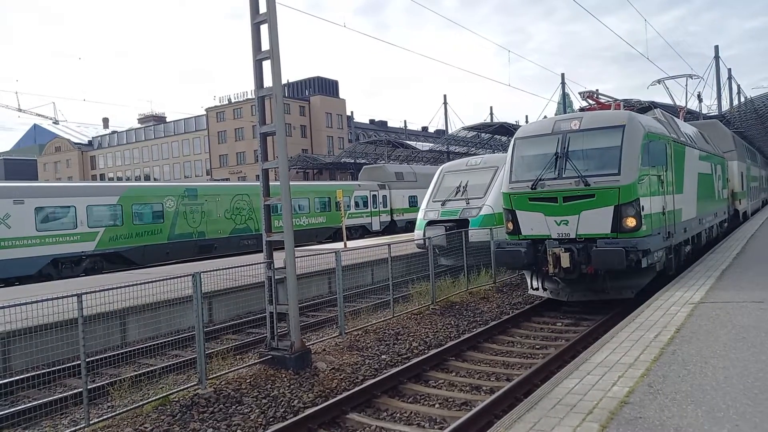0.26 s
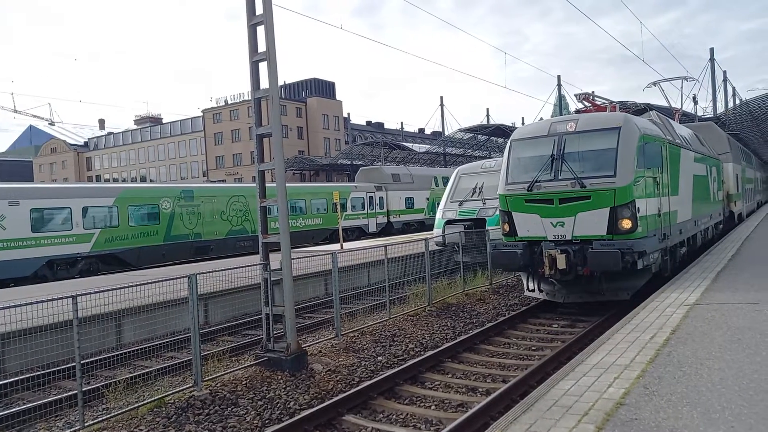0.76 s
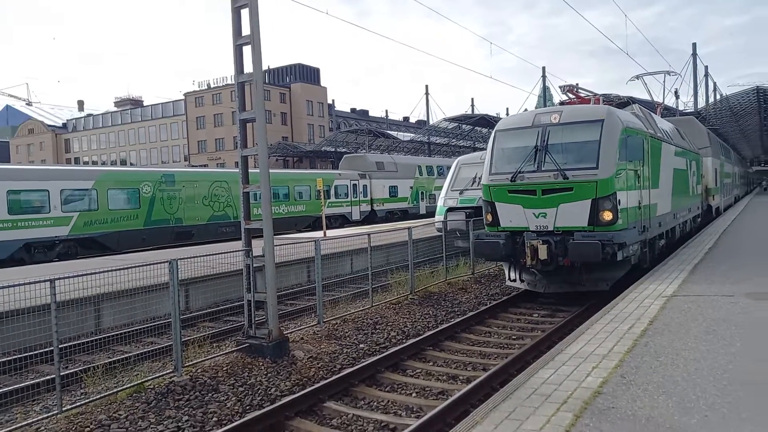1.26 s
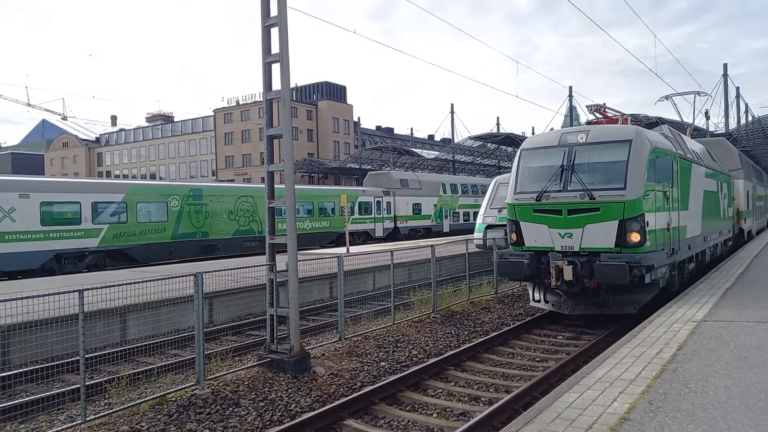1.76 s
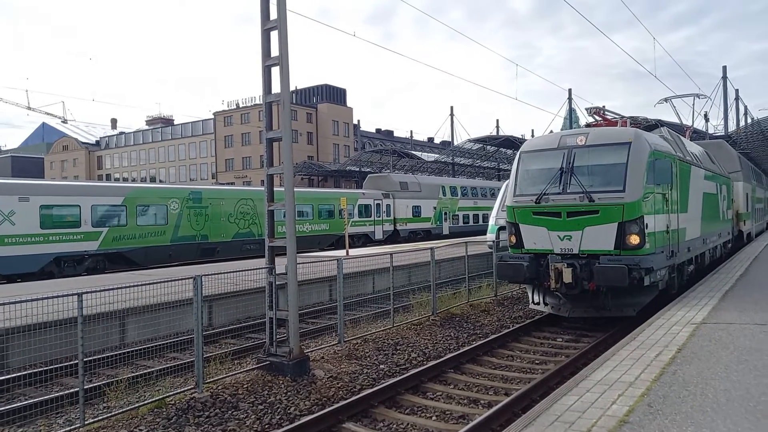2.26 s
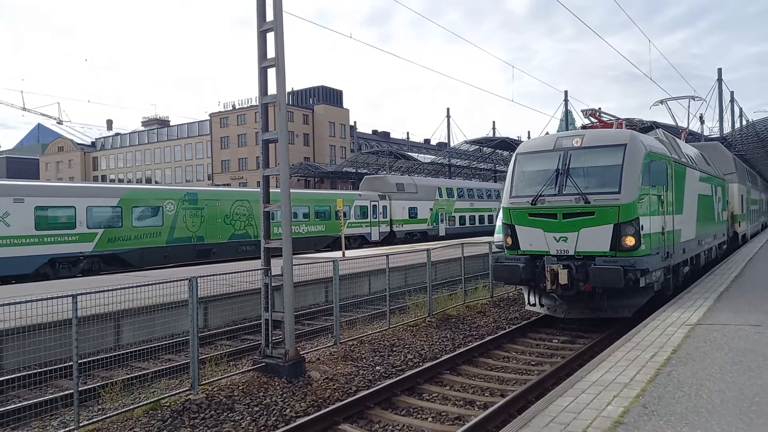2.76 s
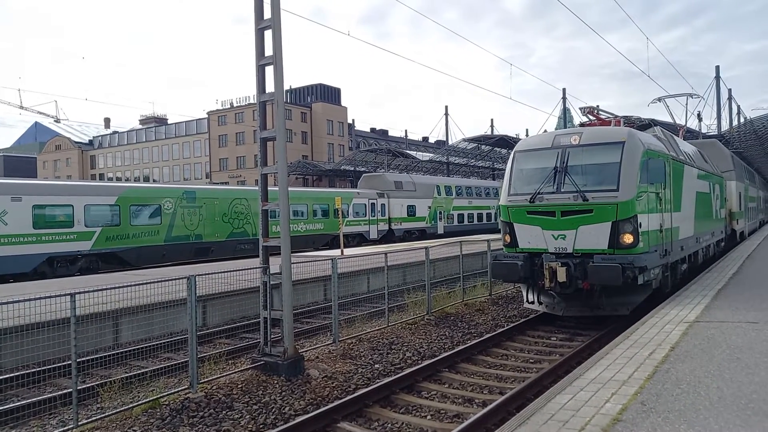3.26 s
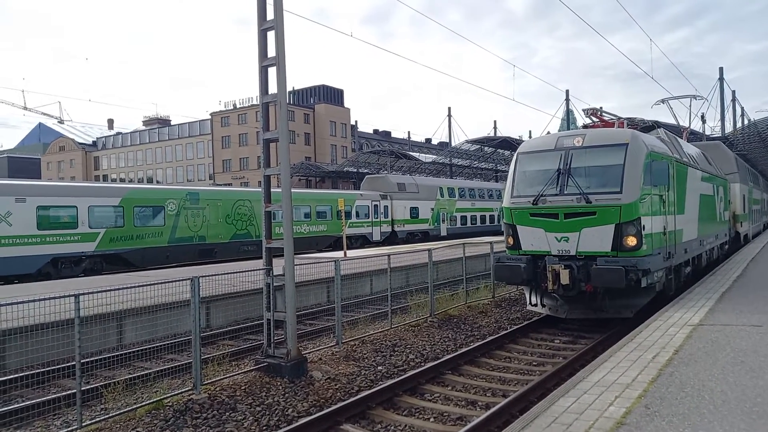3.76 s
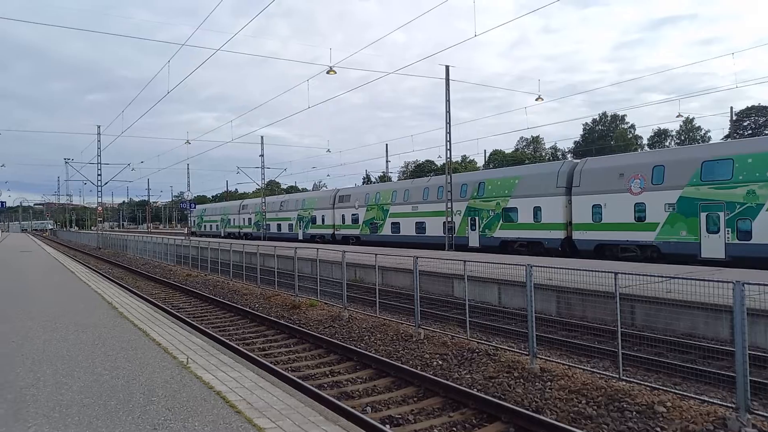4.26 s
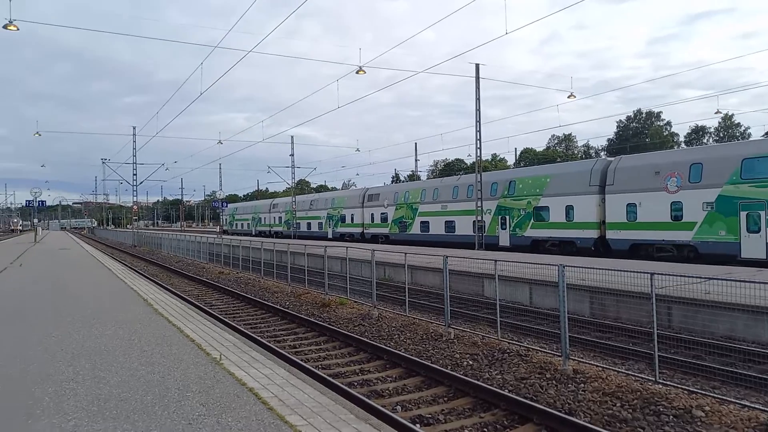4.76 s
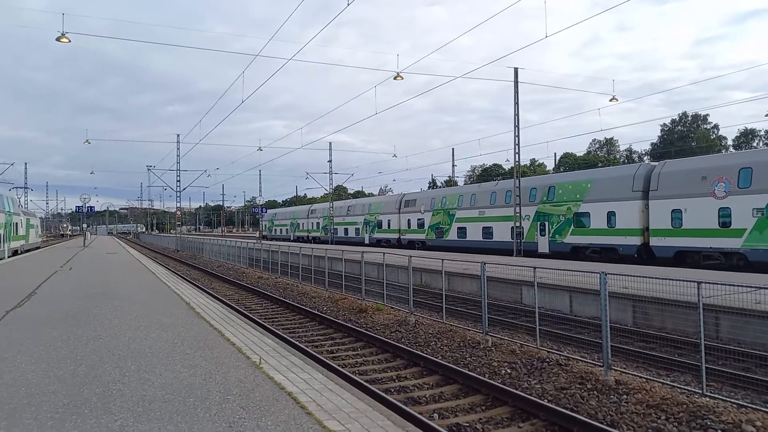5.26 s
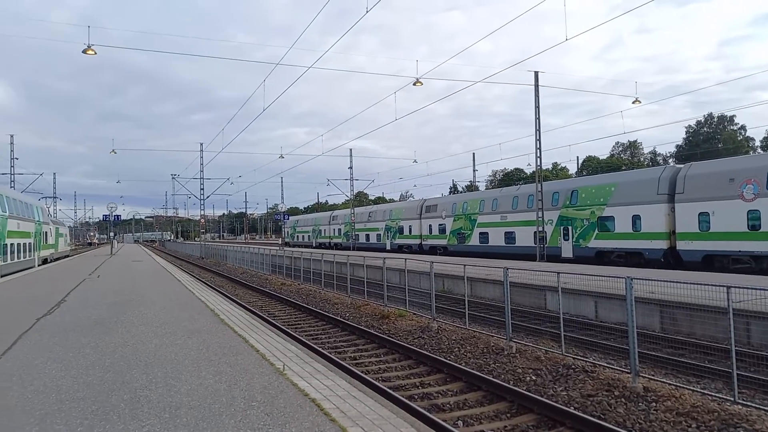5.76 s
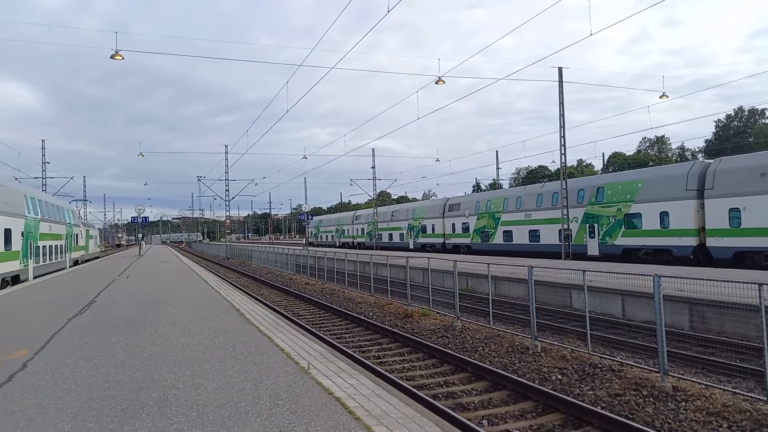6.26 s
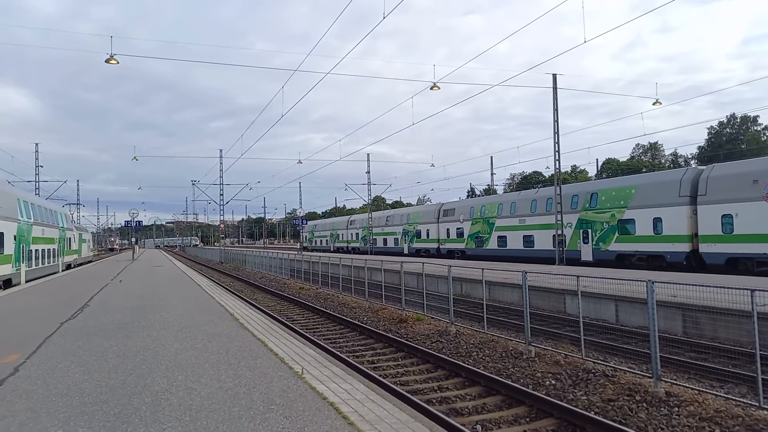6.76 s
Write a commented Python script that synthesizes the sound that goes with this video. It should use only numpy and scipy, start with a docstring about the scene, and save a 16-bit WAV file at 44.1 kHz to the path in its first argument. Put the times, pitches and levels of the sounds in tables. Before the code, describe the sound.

A standing electric locomotive roars and hums beside a platform as brakes ring, then an abrupt change to quieter rolling coaches, wind buffets and singing wheels.

```python
"""A standing electric locomotive roars: noise shaped into blower rumble, ringing ducts and rushing air, over
humming sine tones, while the brakes of an arriving train ring and rub as narrow and broad bands of noise.
Then the scene changes abruptly to the open end of the platform: coaches roll by as rumbling, roaring noise,
a converter whines as a comb of tones, a wheel flange sings, metal clacks once and wind buffets mostly the left.
Faint wheel squeals and rubs, short bands of noise, are heard in both scenes."""
import sys
import numpy as np
from scipy import signal
from scipy.fft import rfft, irfft
from scipy.io import wavfile
from scipy.ndimage import uniform_filter1d, map_coordinates

SR = 44100
rng = np.random.default_rng(int(sys.argv[2]) if len(sys.argv) > 2 else 0)


def to_wav(sig):
    """Store sig (one row per channel, or 1-D mono) as 16-bit WAV at the path in sys.argv[1].

    Samples outside -1..1 are clipped; the rate is SR.
    """
    pcm = np.clip(np.atleast_2d(sig), -1, 1) * 32767
    pcm = np.round(pcm).astype(np.int16)
    wavfile.write(sys.argv[1], SR, pcm.T)  # frames by channels


N = 309582
T = np.arange(N) / SR
FREQ = np.maximum(np.arange(N // 2 + 1) * SR / N, 1)
LAG_S = 0.00048  # the trains are on the right, so the left side hears them later


def undb(db):
    """Turn decibels into gain."""
    return 10 ** (np.asarray(db) / 20)


def unit(x):
    """Scale to an rms (average strength) of 1."""
    return x / np.sqrt(np.mean(x ** 2))


def curves(rows):
    """Join each column of a table of times by straight lines."""
    s, *columns = np.transpose(rows)
    return [np.interp(T, s, column) for column in columns]


def over_freq(points):
    """Join (Hz, value) points by straight lines on a log-frequency axis."""
    hz, value = np.transpose(points)
    return np.interp(np.log(FREQ), np.log(hz), value)


def resonance(hz, width):
    """Gain of a steep-sided resonance, strongest at its own pitch, scaled to unit power."""
    return unit(1 / (1 + ((FREQ - hz) / (.75 * width)) ** 2))


def walk(rate):
    """Random curve: straight lines between chance values, rate of them a second, with a spread near 1."""
    steps = rng.standard_normal(1024)
    return np.interp(T * rate, np.arange(len(steps)), steps) * np.sqrt(3 / 2)


def swell(middle, length):
    """A rounded rise and fall, 1 at its middle; times in seconds."""
    return np.cos(np.pi * np.clip((T - middle) / length, -.5, .5))


# how alike the left and right sides sound: (f/Hz, coherence 0-1)
SIDE_LIKENESS = [(60, 0.79), (280, 0.96), (600, 0.67), (900, 0.19), (1400, 0.63), (2300, 0.37),
                 (4500, 0.22), (8000, 0)]


def field(gain, right_db):
    """Stereo noise of a given colour: a direct part reaches the left late, reflections differ on each side."""
    heard = np.flatnonzero(gain > gain.max() / 1e4)
    hz = FREQ[heard]
    like_hz, likeness = np.transpose(SIDE_LIKENESS)
    direct, left, right = rng.standard_normal((3, len(hz))) + 1j * rng.standard_normal((3, len(hz)))
    share = np.clip(np.interp(np.log(hz), np.log(like_hz), likeness), 0, .99)
    lag = LAG_S * hz / np.hypot(hz, 500)  # long waves arrive from all round
    direct_sides = np.array([direct * np.exp(-2j * np.pi * hz * lag), direct])
    reflections = np.array([left, right])
    spectrum = np.zeros((2, len(FREQ)), complex)
    spectrum[:, heard] = (np.sqrt(share) * direct_sides + np.sqrt(1 - share) * reflections) * gain[heard]
    balance = undb(np.array([[-right_db], [right_db]]) / 2)
    return unit(irfft(spectrum, N)) * balance


def flow(colour, flutter_db, rate, right_db, ripple_db=0):
    """Turbulent noise of fluttering strength; coach and platform echoes finely ripple its middle range."""
    reach = over_freq([(300, 0), (1200, 1), (5000, 1), (9000, 0)])
    ripple = np.interp(FREQ / 25, np.arange(1024), rng.standard_normal(1024)) * reach
    noise = field(undb(over_freq(colour) + ripple_db * ripple), right_db)
    return noise * undb(flutter_db * walk(rate))


def tone(hz, wander, fade_db, lag_s=LAG_S / 2):
    """A steady or gliding tone; moving air shifts its phase and fades it a little differently on each side."""
    phase = 2 * np.pi * np.cumsum(np.broadcast_to(hz, N)) / SR + wander * walk(6)
    strength_db = fade_db * walk(7.6)
    sides = []
    for lag in (lag_s, 0):
        side_db = strength_db + fade_db * walk(3.44) / 2
        sides.append(np.sin(phase - 2 * np.pi * hz * lag) * undb(side_db))
    return np.sqrt(2) * np.array(sides)


def bend(sides, speed):
    """Shift the pitch of a stereo sound by playing it at a changing speed."""
    return np.array([map_coordinates(side, [np.cumsum(speed)], mode="mirror") for side in sides])


def eddies(colour):
    """Wind pressure of a given colour; dividing by its own recent strength keeps its swings fairly even."""
    swirl = signal.hilbert(irfft(rfft(rng.standard_normal(N)) * colour, N))
    return swirl.real / np.sqrt(uniform_filter1d(np.abs(swirl) ** 2 / 2, size=1500))


# tone colour of the wind: (f/Hz, relative level/dB per Hz)
WIND_SPECTRUM = [(25, -28), (45, -5.5), (70, -1), (120, 2.5), (190, -4.5), (260, -6), (400, -35),
                 (900, -49), (4000, -110)]
# eddies that buffet each side: (middle t/s, length/s, f/Hz, left level/dB, right level/dB)
WIND_BUFFETS = [(3.98, 0.031, 90, -15.5, -38), (4.101, 0.053, 73, -17.5, -38), (4.499, .1, 119.4, -14, -40),
                (4.565, 0.07, 141, -22, -42), (4.606, 0.016, 110, -29, -22), (4.632, 0.07, 151, -14, -40),
                (4.696, .04, 193, -18.5, -42), (5.036, 0.11, 131, -39, -41), (5.195, 0.051, 111, -36, -36),
                (5.538, 0.036, 108, -36, -26), (5.927, 0.041, 110, -30, -29), (6.273, .05, 66, -35, -35),
                (6.345, 0.05, 66.7, -31, -32), (6.413, 0.045, 66, -32.5, -32),
                (6.624, 0.12, 63.5, -32, -33), (6.715, .04, 75, -36, -37)]
BUFFET_WIDTH, BUFFET_LOW_HZ = 0.43, 46  # bandwidth as a share of the pitch; nothing deeper is heard
BREEZE_LEFT_DB, BREEZE_RIGHT_DB, BREEZE_FLUTTER_DB = -45.5, -40, 3.5
# one long gust builds towards these levels, but fades out over the release time before its end
GUST_LEFT_DB, GUST_RIGHT_DB, GUST_BUILD_DB_PER_S = -22.5, -34, 6
GUST_END_S, GUST_RELEASE_S = 4.725, 0.093


def wind():
    """Breeze and gust press on each side separately; the biggest eddies buffet both."""
    release = np.clip((GUST_END_S - T) / GUST_RELEASE_S, 0, 1)
    gust = release * undb(GUST_BUILD_DB_PER_S * (T - GUST_END_S))
    colour = undb(over_freq(WIND_SPECTRUM))
    sides = []
    for gust_db, breeze_db in [(GUST_LEFT_DB, BREEZE_LEFT_DB), (GUST_RIGHT_DB, BREEZE_RIGHT_DB)]:
        breeze = undb(breeze_db + BREEZE_FLUTTER_DB * walk(9))
        sides.append(eddies(colour) * np.hypot(undb(gust_db) * gust, breeze))
    sides = np.array(sides)
    for s, length, hz, left_db, right_db in WIND_BUFFETS:
        colour = resonance(hz, BUFFET_WIDTH * hz) * (FREQ > BUFFET_LOW_HZ)
        sides = sides + np.outer(undb([left_db, right_db]), eddies(colour) * swell(s, length))
    return sides


# short wheel squeals: (middle t/s, length/s, f/Hz, level/dB at the middle)
WHEEL_SQUEALS = [(0.073, 0.32, 10110, -56), (.78, .22, 10110, -58), (1.13, 0.27, 10110, -64),
                 (1.8, .55, 10110, -67), (1.927, 0.044, 10140, -53), (2.3, .2, 10110, -65),
                 (4.072, 0.15, 6220, -57.5), (4.27, 0.5, 7950, -63.5), (4.33, .45, 6190, -69),
                 (4.44, .2, 2410, -59), (4.632, 0.29, 2376, -58.5), (5, .35, 15200, -77)]
# rubs and hisses and, in the last row, a low ringing in the coach rumble:
# (middle t/s, length/s, f/Hz, width/Hz, level/dB at the middle)
RUBS_AND_LOW_RING = [(.88, .22, 11000, 4000, -57), (2.3, .9, 11500, 3500, -62.5),
                     (4.3, 0.71, 12500, 4000, -69), (4.55, 0.55, 3900, 1900, -61),
                     (4.52, .3, 4060, 190, -64), (4.68, .55, 3995, 60, -65), (4.49, .12, 3190, 70, -59),
                     (6.06, 0.055, 2350, 500, -57), (6.19, .05, 2200, 700, -56),
                     (6.8, 0.88, 413, 49.7, -47.5)]
SQUEAL_WIDTH = .012  # bandwidth as a share of the pitch


def wheels():
    """Squeals, rubs and a low ringing: each is noise through a narrow or broad resonance that swells and dies."""
    sound = np.zeros((2, N))
    for s, length, hz, db in WHEEL_SQUEALS:
        sound += field(resonance(hz, SQUEAL_WIDTH * hz), right_db=8.5) * undb(db) * swell(s, length)
    for s, length, hz, width, db in RUBS_AND_LOW_RING:
        sound += field(resonance(hz, width), right_db=5.5) * undb(db) * swell(s, length)
    return sound


# tone colour of the clack: (f/Hz, relative level/dB per Hz)
CLACK_SPECTRUM = [(400, -25), (1000, 3), (2400, -1), (3500, -9), (5200, -9), (8500, -27), (11000, -21),
                  (13000, -42)]
CLACK_S, CLACK_DB, CLACK_ATTACK_S, CLACK_DECAY_S = 6.921, -42, .003, .016  # level before the envelope


def clack():
    """Metal in the running gear knocks on metal: coloured noise rises sharply and dies away at once."""
    age = np.maximum(T - CLACK_S, 0)
    envelope = np.minimum(age / CLACK_ATTACK_S, 1) * np.exp(-age / CLACK_DECAY_S)
    return field(undb(over_freq(CLACK_SPECTRUM)), right_db=3) * undb(CLACK_DB) * envelope


# wheel flange pressing on the rail, before its unevenness: (t/s, f/Hz, level/dB)
FLANGE_PATH = [(6.25, 4330, -85), (6.39, 4325, -66), (6.51, 4310, -59), (6.58, 4260, -53),
               (6.645, 4295, -56.5), (6.7, 4304, -52.5), (6.765, 4300, -58), (6.83, 4310, -50.5),
               (6.925, 4280, -48), (7.02, 4220, -51)]
# close wheel modes that sing together and beat: (f/Hz above that pitch, level/dB relative to it)
SINGING_MODES = [(-77.5, -10), (0, -5), (106, -9)]
# other wheel modes that catch for a moment: (middle t/s, length/s, f/Hz, width/Hz, level/dB before unevenness)
CATCHING_MODES = [(7, .12, 4120, 90, -56), (6.44, .12, 3420, 60, -65), (6.65, .16, 3400, 80, -61),
                  (6.775, .14, 3450, 22, -55.5), (6.86, .12, 3420, 64, -61), (7, .12, 3290, 60, -62),
                  (6.52, .4, 5380, 220, -65), (6.71, .26, 5290, 90, -67), (6.6, .5, 6230, 150, -75)]
FLANGE_WAVER = 0.00298  # share by which stick and slip bend the pitch
STRAND_FLUTTER_DB = 2.5  # each mode catches and slips on its own
GRIND_HZ, GRIND_WIDTH_HZ, GRIND_DB = 4340, 230, -4  # rough band, before it follows the pitch and level path
FLANGE_SURGE_DB = 1.9  # unevenness of the contact


def flange():
    """A flange grinds on the rail; close wheel modes sing with the grinding, waver and beat."""
    pitch, level_db = curves(FLANGE_PATH)
    strands = np.zeros((2, N))
    for offset, db in SINGING_MODES:
        strand_hz = (pitch + offset) * (1 + FLANGE_WAVER * walk(90))
        strand = tone(strand_hz, wander=1.0, fade_db=1.0, lag_s=LAG_S)
        strands += strand * undb(db + STRAND_FLUTTER_DB * walk(30))
    rough_band = field(resonance(GRIND_HZ, GRIND_WIDTH_HZ), right_db=0.3)
    grind = bend(rough_band, pitch / pitch[0]) * undb(GRIND_DB)
    catches = np.zeros((2, N))
    for s, length, hz, width, db in CATCHING_MODES:
        catches += field(resonance(hz, width), right_db=-0.5) * undb(db) * swell(s, length)
    return ((strands + grind) * undb(level_db) + catches) * undb(FLANGE_SURGE_DB * walk(70))


# swelling and sinking of the whine: (t/s, relative level/dB)
WHINE_PATH = [(3.95, 2), (4.22, -0.5), (4.4, 2), (4.8, -7), (5.03, -0.5), (5.18, -9), (5.34, -3.5),
              (5.52, -10), (5.73, -12), (5.83, -4), (5.98, -11), (6.88, -13), (7.02, -5)]
WHINE_FLUTTER_DB = 2  # quick unevenness of the whine
SWITCH_HZ, SIDEBAND_HZ = 7154, 58.3  # switching tone and the spacing of its sidebands
# starting levels, before the falls below and the whine's path; every third sideband is strong
SWITCH_DB, STRONG_SIDEBAND_DB, WEAK_SIDEBAND_DB = -62, -66, -72.5
SIDEBAND_FALL_DB, UPPER_SIDEBAND_DB = 1.5, -2.5  # fall per step from the centre; the upper side is weaker


def converter(count=9):
    """A switching tone with a comb of sidebands; it swells and sinks unevenly, weaker later, rising at the end."""
    comb = undb(SWITCH_DB) * tone(SWITCH_HZ, wander=.98, fade_db=2.0)
    for step in range(-count, count + 1):
        if step:
            db = WEAK_SIDEBAND_DB if step % 3 else STRONG_SIDEBAND_DB
            db = db - SIDEBAND_FALL_DB * abs(step) + UPPER_SIDEBAND_DB * (step > 0)
            comb = comb + undb(db) * tone(SWITCH_HZ + step * SIDEBAND_HZ, wander=1.6, fade_db=4)
    return comb * undb(curves(WHINE_PATH)[0] + WHINE_FLUTTER_DB * walk(28))


# strength of the rolling: (t/s, rumble level/dB, rail roar level/dB)
ROLL_PATH = [(3.95, -34, -46), (4.6, -38, -47), (4.85, -40.5, -50), (5.65, -40, -51), (5.8, -40, -51.5),
             (6.35, -35.5, -49), (6.75, -39.5, -49), (7.02, -37, -47.5)]
# tone colours of the rumble and of the rail roar: (f/Hz, relative level/dB per Hz)
ROLL_RUMBLE_SPECTRUM = [(15, -35), (30, -26), (42, -13), (60, 0), (105, -6.5), (145, -2.5), (195, -3),
                        (290, 0.5), (420, -6.5), (560, -11), (750, -16), (1200, -34), (3000, -94)]
RAIL_ROAR_SPECTRUM = [(300, -28), (700, 0.5), (1100, -5.5), (1550, -8.5), (1900, -11.5), (2600, -13.5),
                      (3300, -16), (4950, -20), (6400, -27.5), (7400, -19), (8400, -35), (9600, -36),
                      (10400, -28), (11300, -29), (12200, -42), (15500, -44)]
# patches of rough rail that scrape under the wheels: (f/Hz, width/Hz, level/dB relative to the roar)
RAIL_SCRAPES = [(424, 100, -6.5), (1550, 600, -15.5), (2090, 340, -13.5), (2550, 300, -15)]
# surges of the rumble as wheels cross rough track: (middle t/s, length/s, f/Hz, level/dB at the middle)
RUMBLE_SURGES = [(5.032, 0.13, 230, -41), (5.84, .04, 330, -45), (6.012, 0.052, 300, -37),
                 (6.106, 0.14, 360, -39), (6.27, 0.027, 300, -35), (6.317, 0.048, 290, -35),
                 (6.423, 0.12, 310, -34.5), (6.634, 0.08, 380, -35), (6.818, 0.092, 376, -41),
                 (6.905, 0.093, 400, -37.5)]
# coach fans, before the balance to the right: (f/Hz, level/dB)
COACH_FANS = [(565, -66.5), (612, -67), (2570, -74)]
SCRAPE_FLUTTER_DB, SURGE_WIDTH_HZ = 2.5, 200


def coaches():
    """Wheels rumble in surges, the rails roar and scrape; fans and the converter sing on the right."""
    low_db, high_db = curves(ROLL_PATH)
    rumble = flow(ROLL_RUMBLE_SPECTRUM, flutter_db=2.04, rate=18, right_db=1.0) * undb(low_db)
    roar = flow(RAIL_ROAR_SPECTRUM, flutter_db=0.9, rate=14, right_db=0.9, ripple_db=2.1)
    scrapes = np.zeros((2, N))
    for hz, width, db in RAIL_SCRAPES:
        scrapes += field(resonance(hz, width), right_db=-3) * undb(db + SCRAPE_FLUTTER_DB * walk(40))
    surges = np.zeros((2, N))
    for s, length, hz, db in RUMBLE_SURGES:
        surges += field(resonance(hz, SURGE_WIDTH_HZ), right_db=-2.0) * undb(db) * swell(s, length)
    fans = sum(undb(db) * tone(hz, wander=0.95, fade_db=4.0) for hz, db in COACH_FANS)
    to_the_right = undb(np.array([[-2.5], [2.5]]))
    return rumble + surges + (roar + scrapes) * undb(high_db) + (fans + converter()) * to_the_right


# brakes of the arriving train, before the pitch sinks: (f/Hz, width/Hz, level/dB, fade from t/s, silent by t/s)
BRAKE_BANDS = [(2910, 630, -51.5, 0.47, 1.9), (3635, 35, -58.5, .2, 0.99), (3635, 40, -62.5, 2.1, 3.2),
               (4662, 55, -59.5, 1.5, 2.7), (6540, 2500, -59, 0.55, 1.6), (9300, 240, -63.5, 0.76, 1.4),
               (10300, 130, -72, 0.91, 2.9), (10400, 1900, -58, 0.71, 1.4)]
BRAKE_SAG_PER_S = .006  # share of the pitch lost per second


def brakes():
    """The brakes of the arriving train ring and rub, sink a little in pitch and die away as it slows."""
    sound = np.zeros((2, N))
    for hz, width, db, fade, end in BRAKE_BANDS:
        sound += field(resonance(hz, width), right_db=4.5) * undb(db) * np.interp(T, [fade, end], [1, 0])
    return bend(sound, 1 - BRAKE_SAG_PER_S * T)


# tone colours of blower rumble, rushing air and grille hiss: (f/Hz, relative level/dB per Hz)
BLOWER_RUMBLE_SPECTRUM = [(15, -30), (30, -23), (38, -21), (49, 3.5), (65, 2.5), (125, 3), (175, -4.5),
                          (265, 0.5), (340, -3), (390, -3), (440, -13.5), (520, -19.5), (700, -32.5),
                          (2000, -93)]
RUSHING_AIR_SPECTRUM = [(300, -31), (450, -2.5), (540, -6.5), (660, -4), (770, 0.5), (900, -6), (1270, -13),
                        (1550, -11.5), (2300, -14.5), (2700, -17), (3300, -21.5), (4400, -22), (4950, -23),
                        (5500, -28.5), (6400, -33.5), (7200, -28.5), (8200, -42), (12000, -65)]
GRILLE_HISS_SPECTRUM = [(4000, -70), (7800, -15), (9000, -11), (10400, -3), (11200, 0), (12300, 0),
                        (13300, -10), (15500, -19)]
# casing and duct resonances driven by the blowers: (f/Hz, width/Hz, level/dB)
DUCT_RINGS = [(194.3, 11, -41.5), (218.5, 8.6, -40), (246.7, 14.3, -36), (294.4, 8, -35.5),
              (403.6, 16, -52), (569, 7, -51.5), (714, 27, -49), (761.5, 39, -63), (811, 16, -50),
              (1589, 50, -59), (2236, 100, -55.5)]
# ducts that boom for a while: (middle t/s, length/s, f/Hz, level/dB at the middle)
DUCT_BOOMS = [(.48, 0.73, 247.2, -36.5), (1.75, 0.96, 194.2, -36.5), (2.12, 0.32, 243.3, -34.5),
              (2.559, 0.47, 248.4, -31), (2.84, 0.29, 196, -34.5)]
# transformer, fan and converter tones: (f/Hz, level/dB)
HUM_TONES = [(100, -41), (588, -47.5), (882, -56), (1764, -55.5), (7154, -74)]
# a drone that dies away as the train behind draws in: (t/s, f/Hz, level/dB)
DRONE_PATH = [(0, 314, -26), (.4, 313, -29), (.54, 311.6, -39), (.66, 310.2, -32), (1.2, 311, -29),
              (1.4, 308, -46), (2.2, 309, -64)]
# a thin whistle that slides down over the blowers: (t/s, f/Hz, level/dB)
WHISTLE_PATH = [(1.85, 2330, -80), (1.96, 2305, -55), (2.1, 2250, -59), (2.3, 2230, -72), (2.62, 2224, -57),
                (2.75, 2168, -55.5), (3.02, 2170, -57), (3.11, 2095, -54), (3.2, 2090, -65),
                (3.45, 2080, -74), (3.5, 2100, -90)]
RUMBLE_DB, AIR_DB, HISS_DB = -29, -38.5, -61  # before the arriving train's extra and the hiss's rise
HISS_RISE_DB_PER_S = 1  # the grille hiss slowly grows
ARRIVAL_DB, ARRIVAL_FADE_S = 1.6, 0.33  # the train drawing in behind adds to the noise at first


def locomotive():
    """Blowers rumble, ring their ducts and rush through the grilles over the electrical hum."""
    arrival_db = ARRIVAL_DB * np.exp(-T / ARRIVAL_FADE_S)
    rumble = flow(BLOWER_RUMBLE_SPECTRUM, flutter_db=0.92, rate=12, right_db=0.4)
    rumble = rumble * undb(RUMBLE_DB + arrival_db)
    air = flow(RUSHING_AIR_SPECTRUM, flutter_db=0.6, rate=10, right_db=2.0, ripple_db=1.98)
    air = air * undb(AIR_DB + arrival_db)
    hiss = flow(GRILLE_HISS_SPECTRUM, flutter_db=1.0, rate=8.9, right_db=2.0)
    hiss = hiss * undb(HISS_DB + HISS_RISE_DB_PER_S * T + arrival_db)
    duct_gain = sum(undb(db) * resonance(hz, width) for hz, width, db in DUCT_RINGS)
    duct_strength = np.sqrt(sum(undb(db) ** 2 for _, _, db in DUCT_RINGS))
    ducts = field(duct_gain, right_db=1.0) * duct_strength
    booms = np.zeros((2, N))
    for s, length, hz, db in DUCT_BOOMS:
        booms += tone(hz, wander=0.44, fade_db=0.0) * undb(db) * swell(s, length)
    hum = sum(undb(db) * tone(hz, wander=0.42, fade_db=1.0) for hz, db in HUM_TONES)
    drone_hz, drone_db = curves(DRONE_PATH)
    drone = tone(drone_hz, wander=0.12, fade_db=0.0) * undb(drone_db)
    whistle_hz, whistle_db = curves(WHISTLE_PATH)
    whistle = tone(whistle_hz, wander=1.1, fade_db=1.5, lag_s=LAG_S) * undb(whistle_db)
    return rumble + air + hiss + ducts + booms + hum + drone + whistle


CHANGE_S, CHANGE_LENGTH_S = 3.92, 0.0088  # middle and length of the quick crossfade between the scenes


def scene():
    """First beside the locomotive, then at the open end of the platform."""
    later = np.clip((T - CHANGE_S) / CHANGE_LENGTH_S + .5, 0, 1)
    platform_end = wind() + clack() + flange() + coaches()
    beside_locomotive = brakes() + locomotive()
    return wheels() + later * platform_end + (1 - later) * beside_locomotive


TOP_HZ = 15500  # the sound is cut steeply above this


def record(dry):
    """Fade softly in and out over 3 ms and cut the top with a steep low-pass filter."""
    opening = np.clip(np.minimum(T, T[-1] - T) / .003, 0, 1)
    low_pass = signal.ellip(10, .2, 80, TOP_HZ, fs=SR, output="sos")
    return signal.sosfilt(low_pass, dry * opening)


dry = scene()
out = record(dry)
to_wav(out)
```